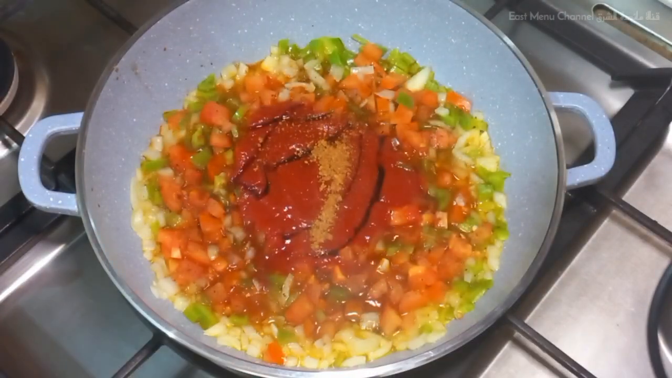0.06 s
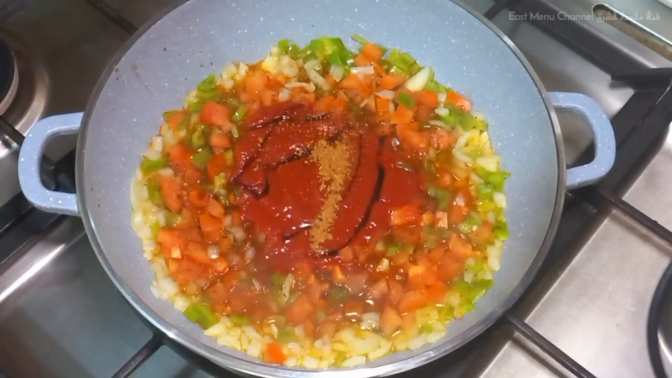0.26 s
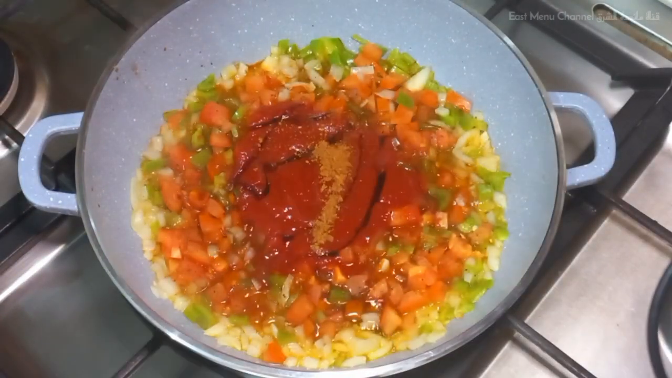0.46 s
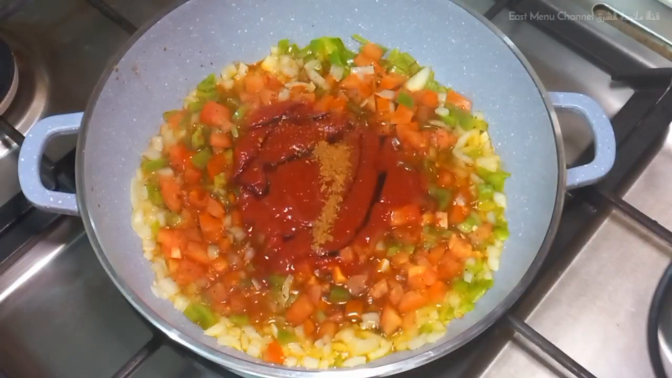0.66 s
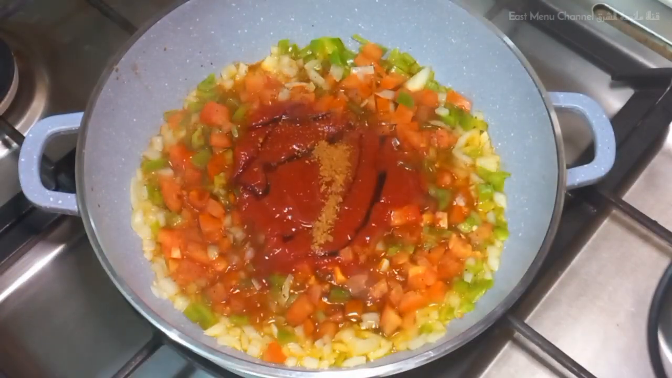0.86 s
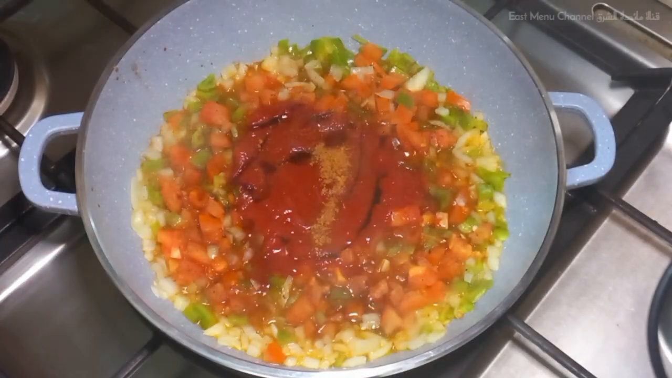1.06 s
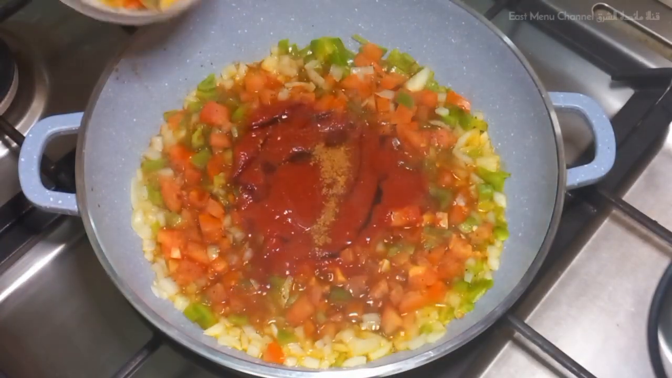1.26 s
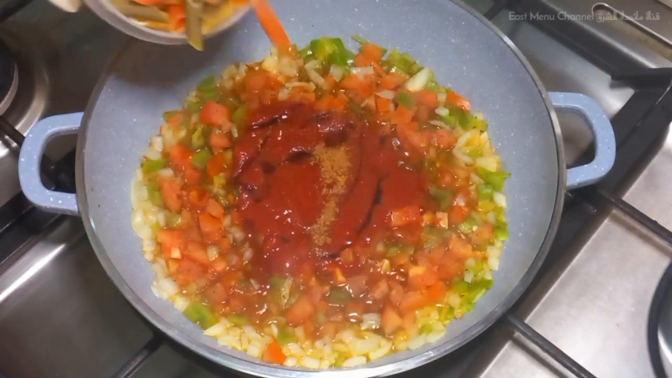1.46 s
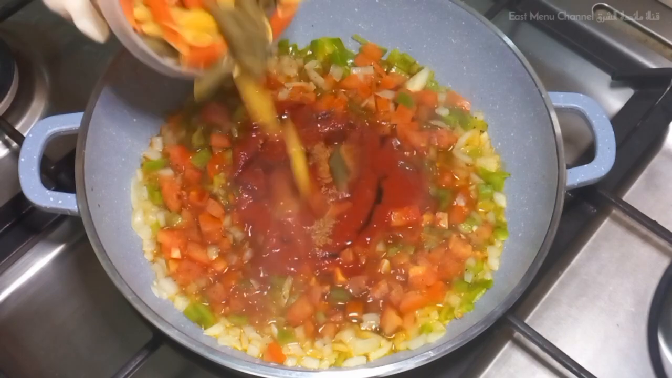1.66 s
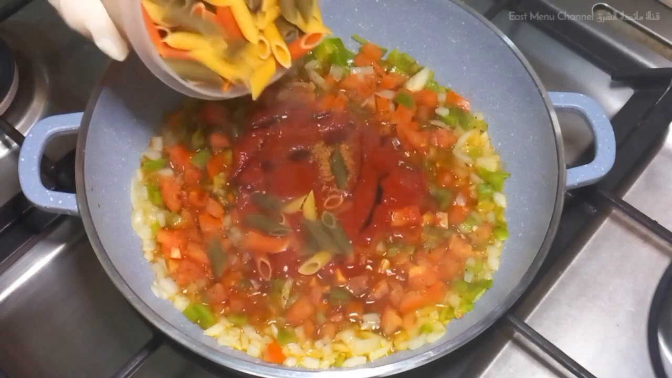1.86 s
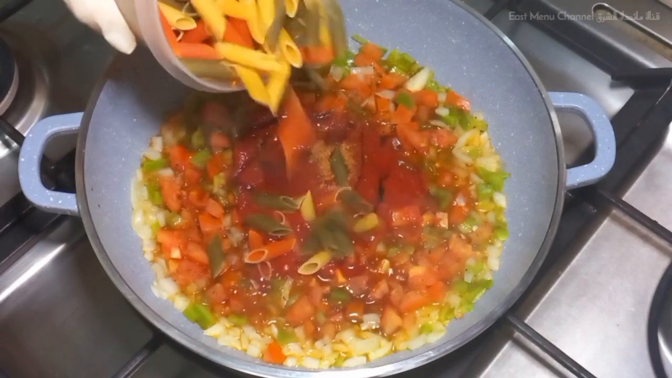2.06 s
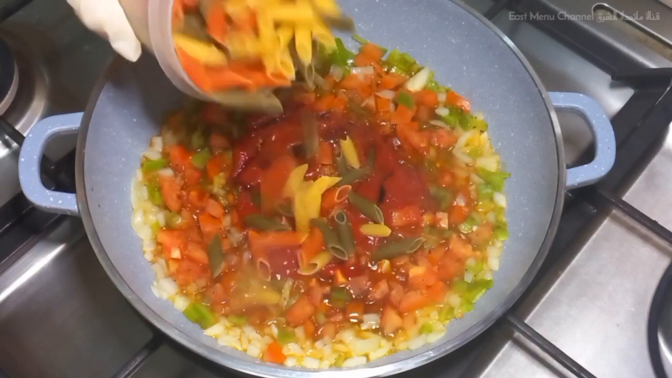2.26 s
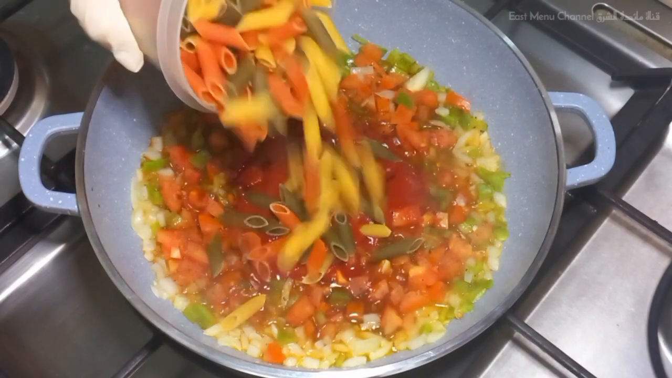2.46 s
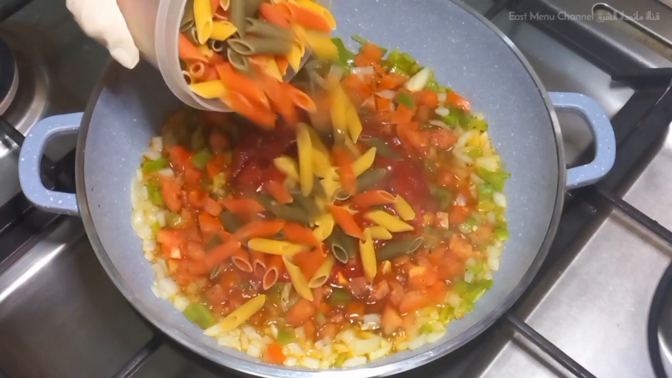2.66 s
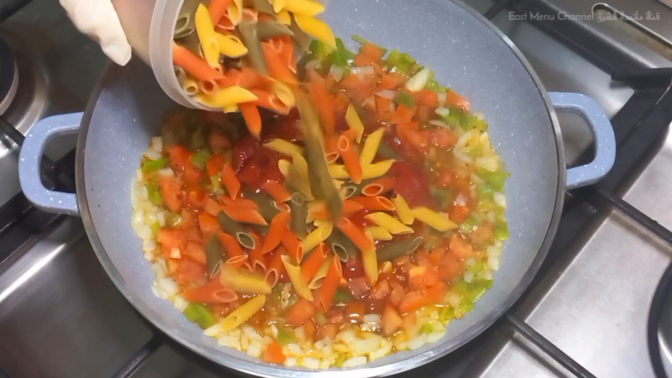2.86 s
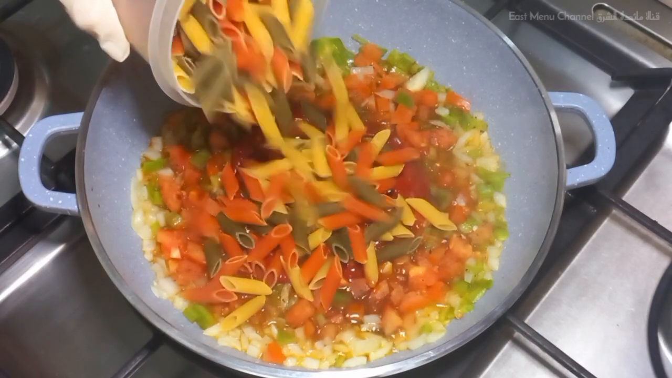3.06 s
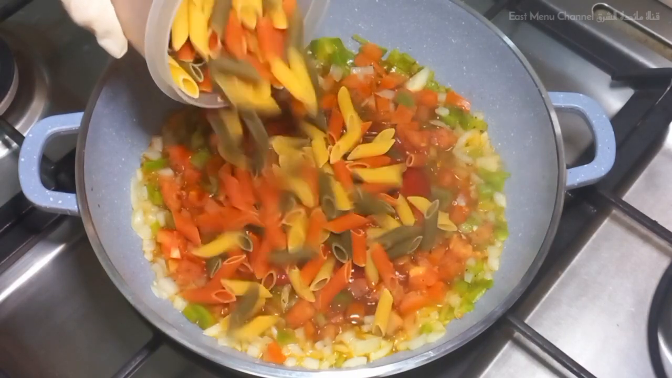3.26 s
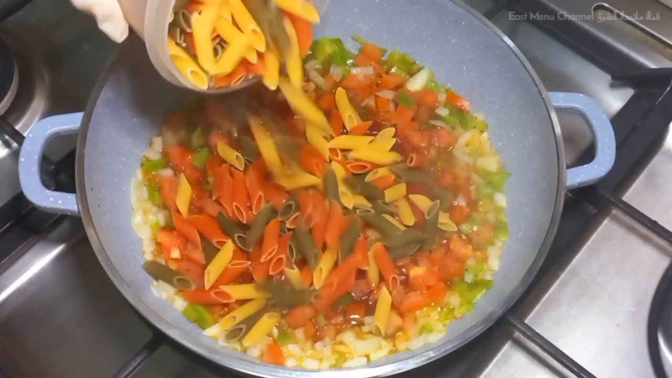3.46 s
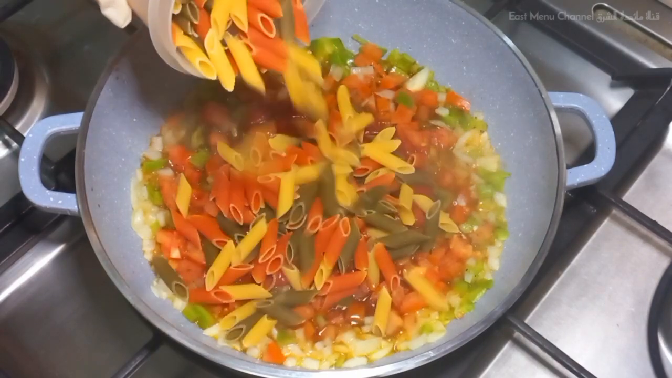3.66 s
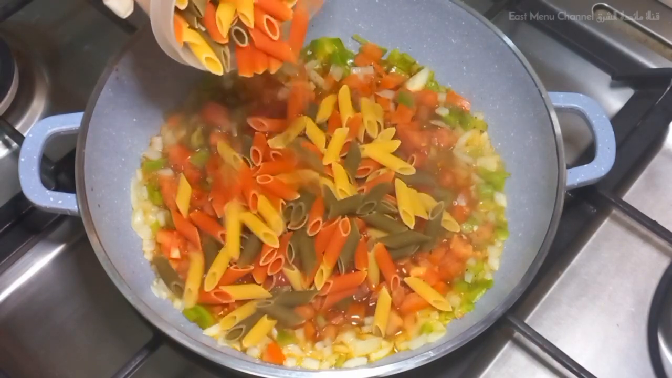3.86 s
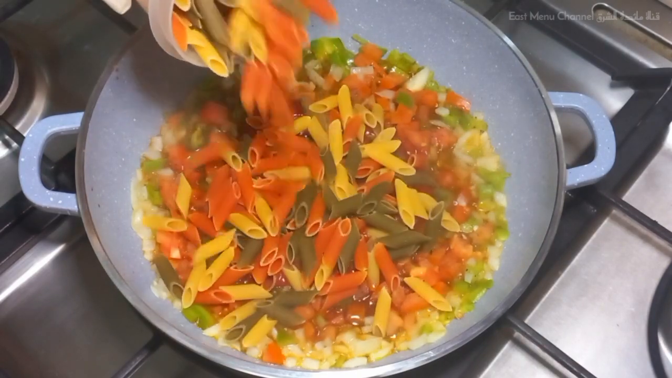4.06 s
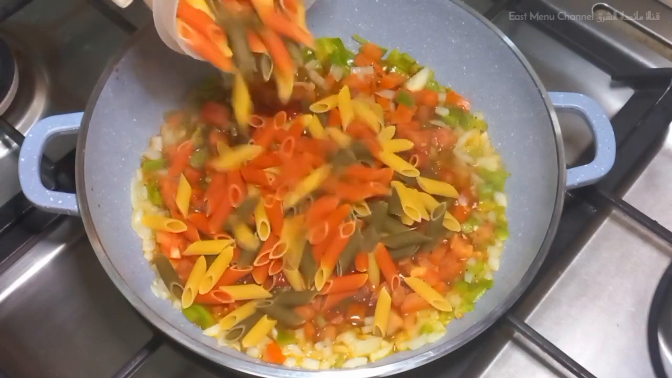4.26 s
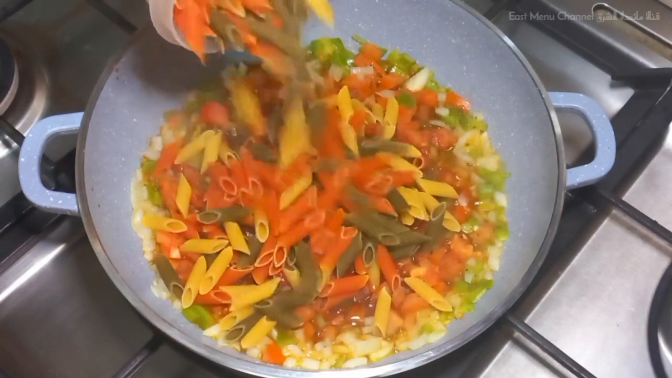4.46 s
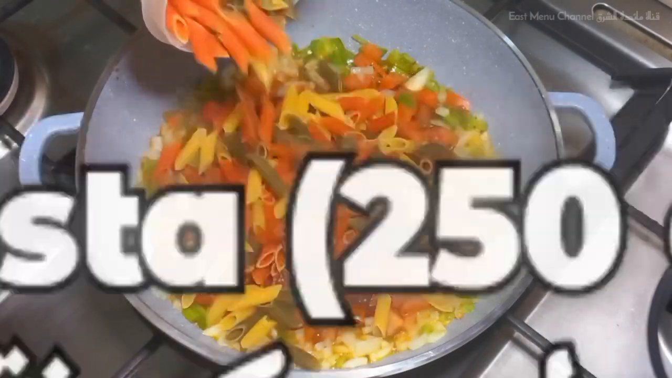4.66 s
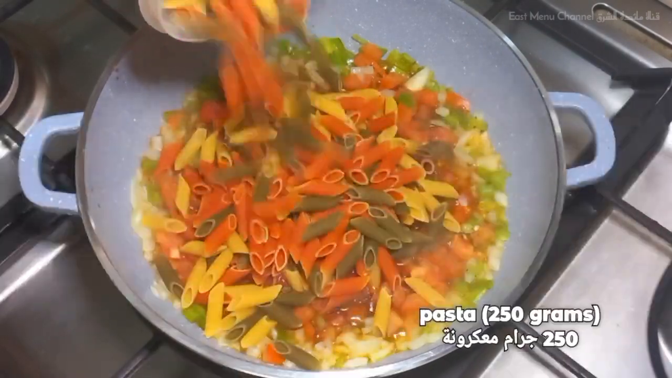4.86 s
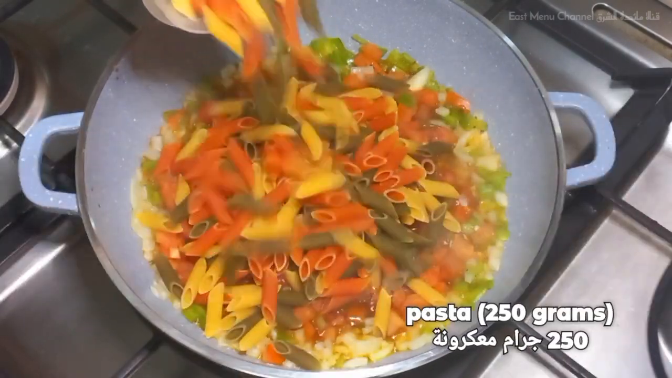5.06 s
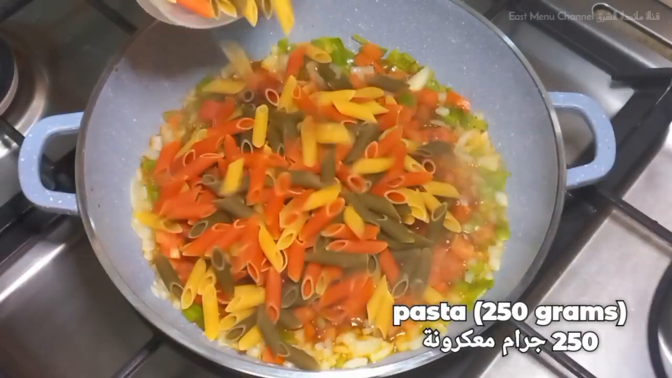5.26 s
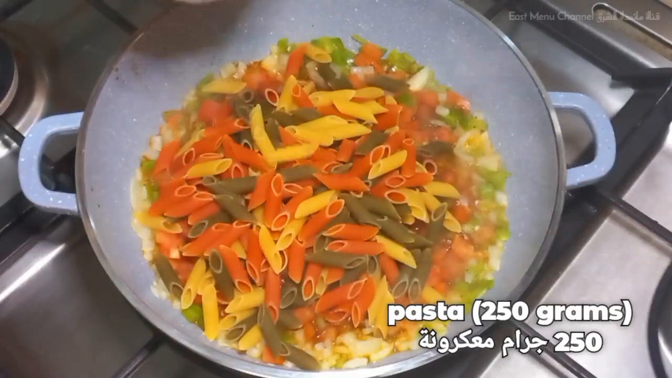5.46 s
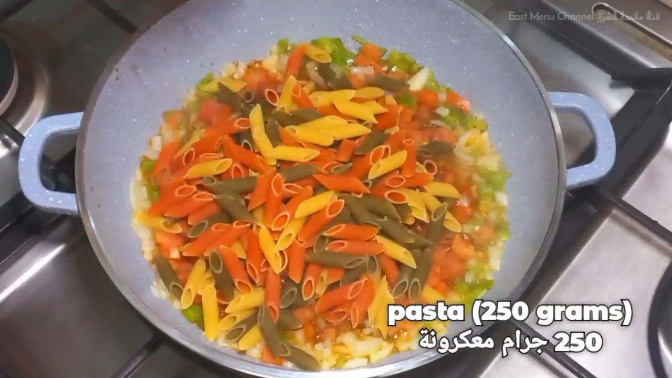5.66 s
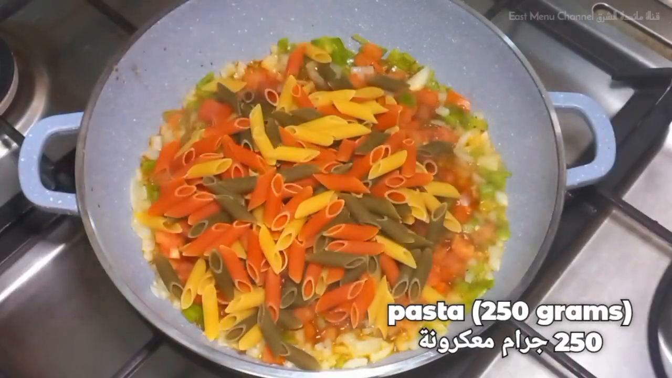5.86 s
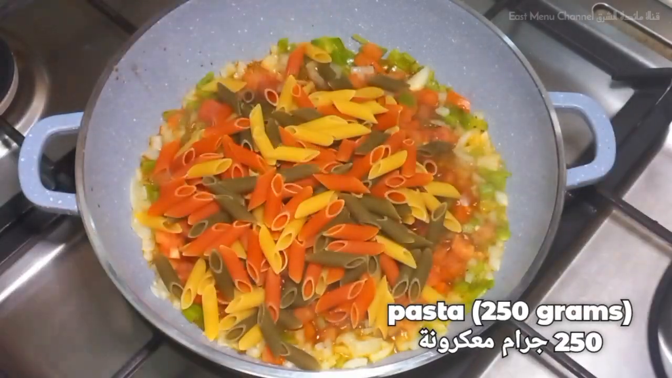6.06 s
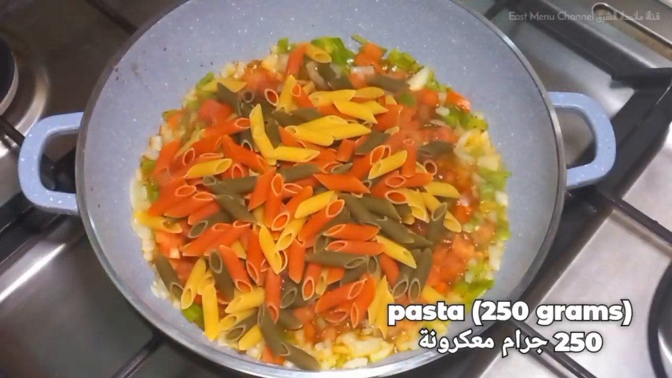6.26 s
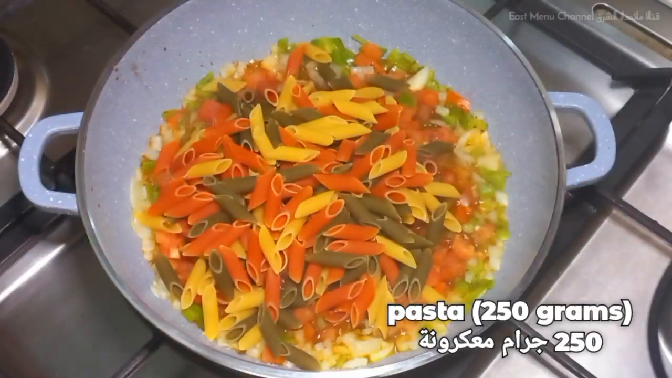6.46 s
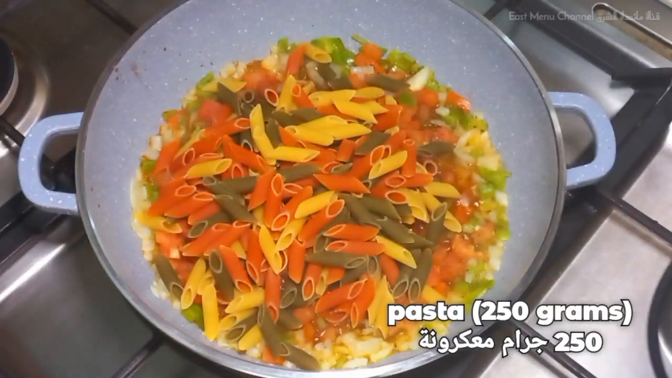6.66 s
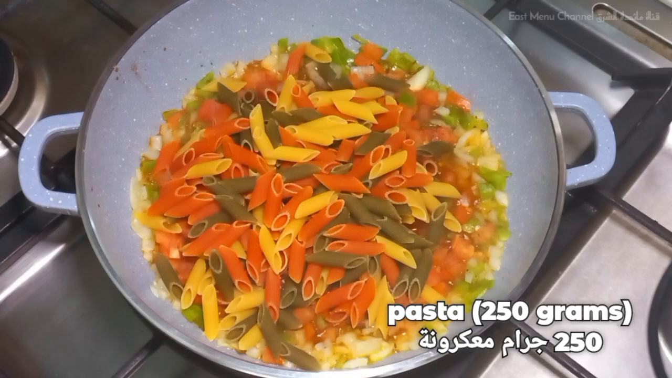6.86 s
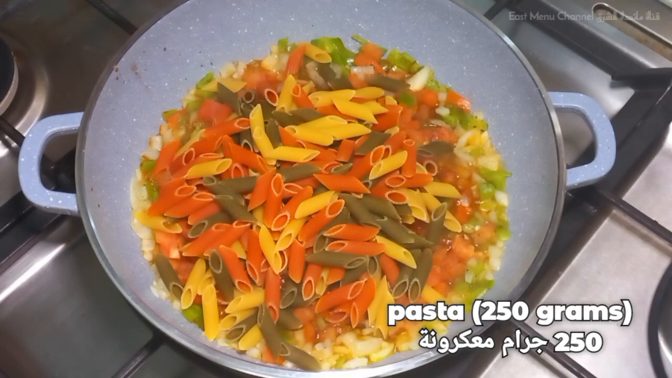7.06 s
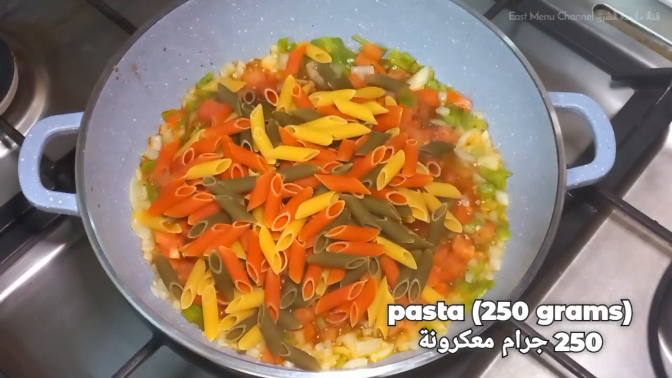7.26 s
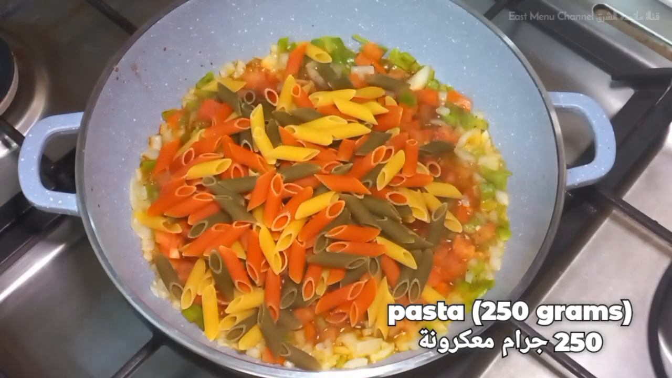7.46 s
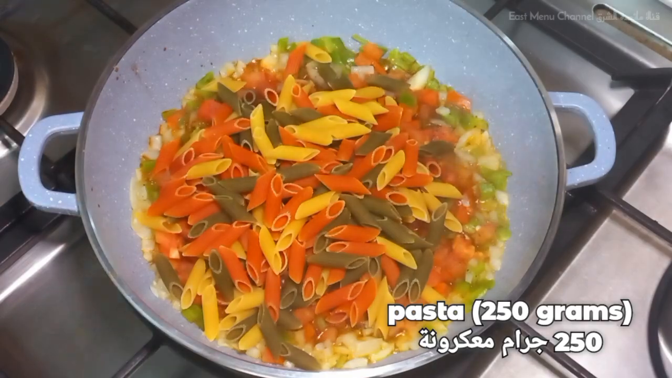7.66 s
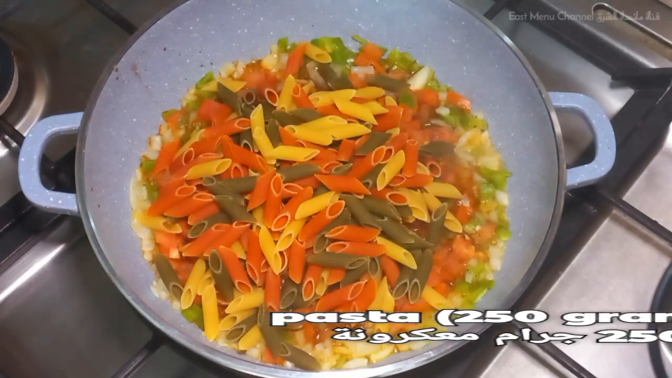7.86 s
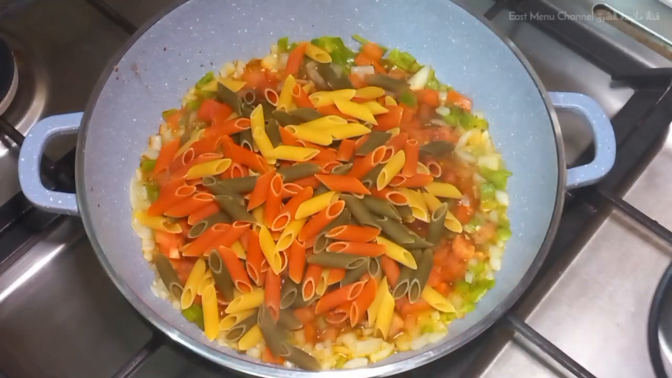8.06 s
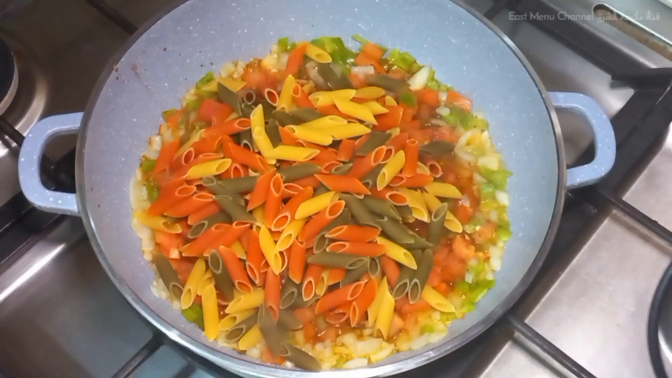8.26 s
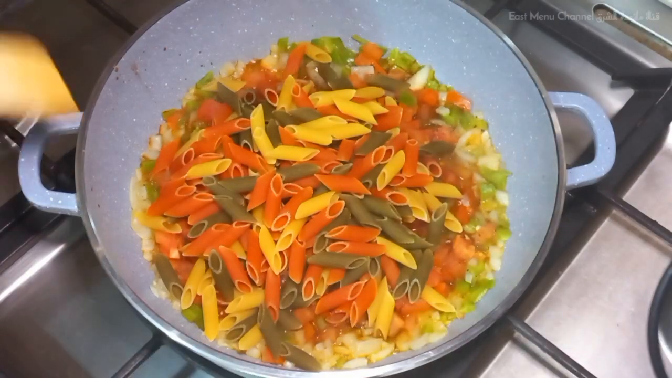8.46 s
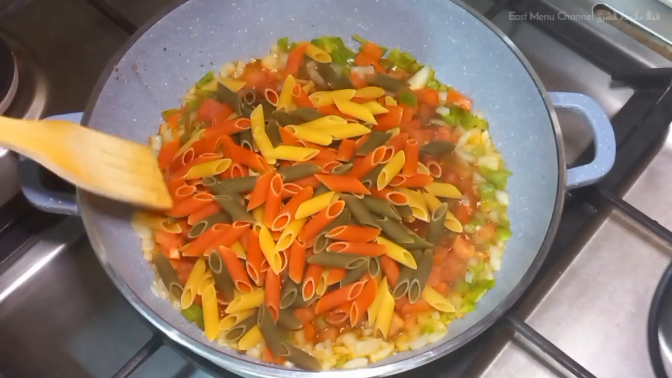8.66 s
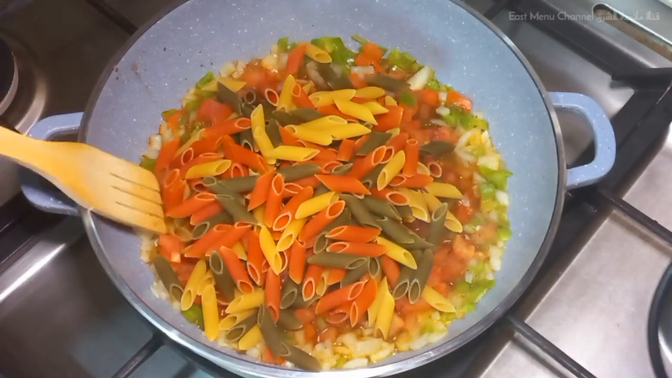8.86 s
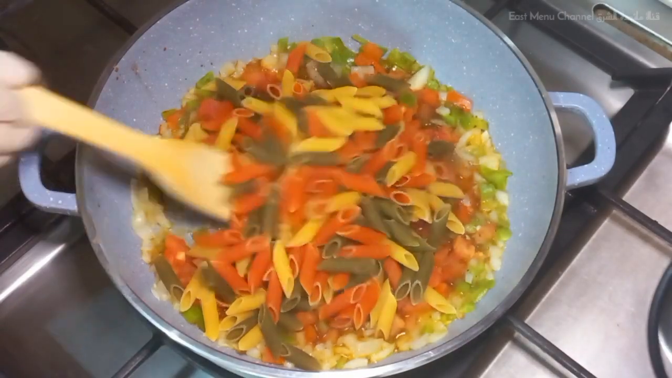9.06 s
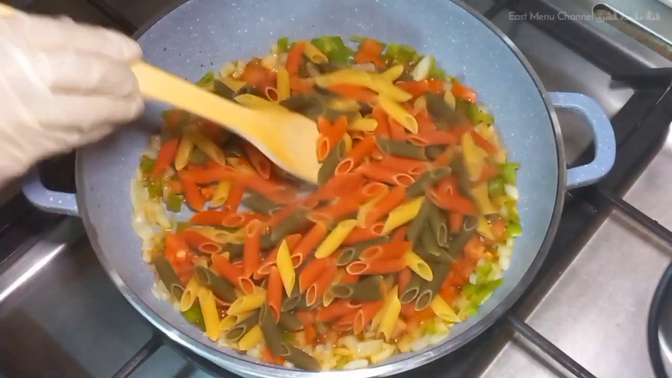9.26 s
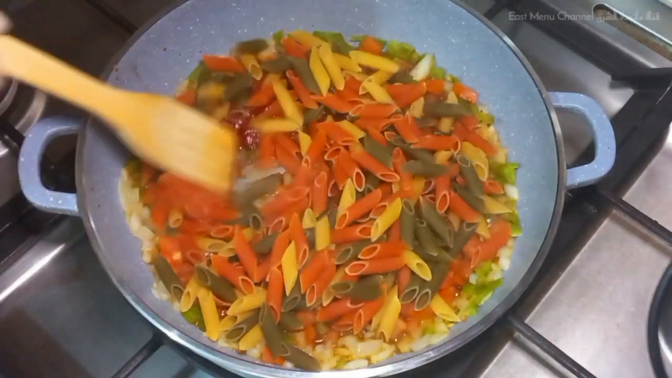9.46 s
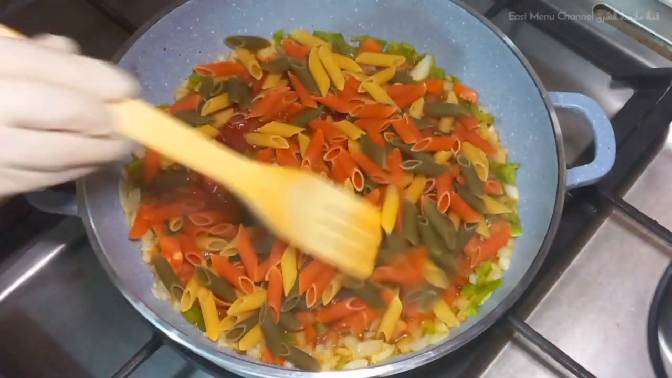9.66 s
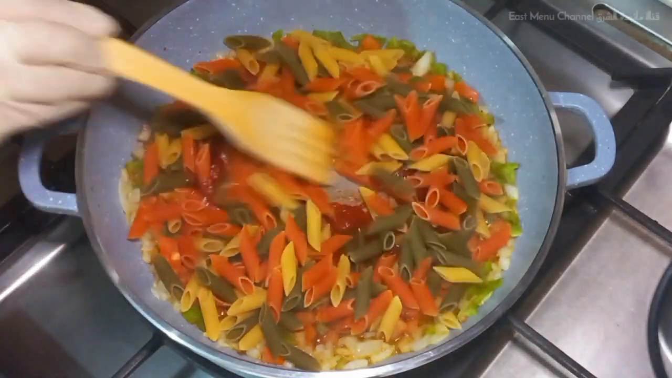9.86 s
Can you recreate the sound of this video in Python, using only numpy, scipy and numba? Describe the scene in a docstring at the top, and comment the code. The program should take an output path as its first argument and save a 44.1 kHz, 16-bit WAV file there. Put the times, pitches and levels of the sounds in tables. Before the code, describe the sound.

A close phone-like stereo pickup at a kitchen stove. From 0 to 0.9 s, vegetables fry with steady wet hiss, sharp crackles and bubbly oil pops, over faint burner rumble and soft low thumps. The level dips almost to silence around 0.94 s and returns at once. From 1.0 s, dry pasta clicks dully in a plastic cup, with hard knocks at 1.6 to 1.75 s; from about 1.75 to 5.5 s it pours into the pan, a dense bright clatter in surges, lighter around 3 to 3.8 s and strongest from 4 to 5.1 s. At 5.6 to 6.6 s the cup knocks and scrapes hollowly on the counter. Gentle sizzling and occasional thumps remain until a wooden spatula knocks the pan, briefly ringing, at 8.77 s. From 9 s to the end, stirring makes duller pasta rattles, scuffs and renewed sizzling.

```python
"""Dry pasta tubes rattle out of a plastic cup into a wide pan, as damped tube modes and noise bursts.
The cup is knocked and slid on the counter, by stick-slip; a wooden spatula then excites the pan modes and
pushes the pasta about. Vegetables fry as hiss, crackles and bubbles; soft thumps come through the stove.
A phone hears it all in two channels that are partly coherent; the level dips briefly once."""
import sys
import numpy as np
from scipy import signal
from scipy.fft import rfft, irfft
from scipy.io import wavfile
from scipy.ndimage import uniform_filter1d
from numba import njit

SR = 44100
rng = np.random.default_rng(int(sys.argv[2]) if len(sys.argv) > 2 else 0)


def materialize(psi):
    """Save the field psi as 16-bit PCM at rate SR to the path in sys.argv[1].

    A 1-D psi becomes a single channel; in a 2-D psi each row is a channel.
    """
    bounded = np.clip(np.atleast_2d(psi).T, -1, 1)
    quanta = np.round(bounded * 32767).astype(np.int16)
    wavfile.write(sys.argv[1], SR, quanta)


N = 437472
T = np.arange(N) / SR
HZ = np.maximum(np.fft.rfftfreq(N, 1 / SR), 1)

# All table levels are relative: each function adds its own gain.


def undb(db):
    """Level definition: amplitude ratio of a level in dB."""
    return 10 ** (np.asarray(db) / 20)


def over_hz(table):
    """Spectral envelope: interpolates a table along log frequency."""
    hz, value = np.transpose(table)
    return np.interp(np.log(HZ), np.log(hz), value)


def over_time(table):
    """Temporal envelope: interpolates each column in time, -120 dB outside the table."""
    s, *columns = np.transpose(table)
    return [np.interp(T, s, c, left=-120, right=-120) for c in columns]


def noise(gain, lo_hz, hi_hz):
    """Spectral shaping: three unrelated noises (common, left's own, right's own), joint rms 1."""
    edges = 1 / np.sqrt((1 + (lo_hz / HZ) ** 8) * (1 + (HZ / hi_hz) ** 8))
    x = irfft(rfft(rng.standard_normal((3, N))) * gain * edges, N)
    return x / x.std()


def resonances(table):
    """Resonance: the power responses of damped modes (f/Hz, width/Hz, level/dB) add."""
    return np.sqrt(sum(undb(db) ** 2 / (1 + (2 * (HZ - hz) / width) ** 2) for hz, width, db in table))


@njit
def decay(start, pole, size, rise):
    """Free decay: each grain swells briefly while its rotation dies away; a real pole gives an envelope."""
    out = np.zeros(N)
    for k in range(len(start)):
        z, i, r = size[k], start[k], 1.
        while i < N and abs(z) > .0003 * abs(size[k]):
            r *= rise
            out[i] += z.real * (1 - r)
            z *= pole[k]
            i += 1
    return out


def envelope(s, db, t60, rise_s=.0008):
    """Incoherent summation: bursts of unrelated noise add in power."""
    pole = np.exp(-np.log(1e6) / (np.clip(t60, .002, 5) * SR)) * np.ones(len(s))
    start = (s * SR).astype(np.int64)
    power = decay(start, pole + 0j, undb(2 * db) + 0j, np.exp(-1 / (rise_s * SR)))
    return np.sqrt(power)


def rings(s, hz, db, t60, rise_s=.0008, turns=1):
    """Modal decay: damped sines whose phases in the three paths differ by up to so many turns."""
    pole = np.exp((2j * np.pi * hz - np.log(1000) / t60) / SR) * np.ones(len(s))
    phase, *paths = rng.random((len(s), 4)).T
    phases = np.exp(2j * np.pi * (phase + turns * np.array(paths)))
    start, rise = (s * SR).astype(np.int64), np.exp(-1 / (rise_s * SR))
    return np.array([decay(start, pole, undb(db) * p, rise) for p in phases])


def walk(rate):
    """Slow random modulation: a new random level every 1 / rate s, joined by straight slopes."""
    k = int(SR / rate)
    return uniform_filter1d(np.repeat(rng.standard_normal(N // k + 1), k), k)[:N]


def scatter(count, spread_db):
    """Random arrivals: a few louder grains among many soft ones, with a spare random number each."""
    s, size, u = rng.random((count, 3)).T
    return s * N / SR, -spread_db * np.log(1.008 - size), u


# thumps through the stove: t/s, peak level/dB, hardness/dB (more knock, less boom)
THUMPS = [(0.109, -26.5, -13), (0.528, -22, 7.5), (0.607, -31, 11), (0.882, -28.5, 15.5), (0.983, -32, 4),
          (2.138, -29, 6), (2.342, -34, 8), (2.804, -35, 9), (3.873, -38, 21), (5.659, -36.5, 6),
          (5.925, -31.5, 7), (6.243, -33, -11), (6.907, -31, -3), (7.2295, -38, 18.5), (7.289, -34.5, 10),
          (7.311, -41.5, 25), (7.999, -32.5, 2), (8.415, -25.5, 8), (8.789, -24.5, 12), (8.934, -25, 7),
          (8.961, -30, 14), (9.091, -28, -5), (9.739, -27, -7)]
# short modes of the stove top: f/Hz, level/dB
STOVE = [(140, -8.5), (270, -2), (500, -6), (710, -11)]
# rumble level at a frying level of -38 dB before waver, and dB per dB of frying
RUMBLE_DB, RUMBLE_SLOPE = -57, 0.6
BOOM_DB, BOOM_PER_HARD, BOOM_T60_S = -12, 0.69, 0.27


def thumps():
    """Structure-borne sound: low bursts with a boom and a shorter knock, over wavering burner rumble."""
    s, db, hard_db = np.transpose(THUMPS)
    (fry_db,) = over_time(FRY)
    rumble = undb(RUMBLE_DB + RUMBLE_SLOPE * (fry_db + 38.0) + walk(6.2))
    boom = envelope(s, db + BOOM_DB - BOOM_PER_HARD * hard_db, BOOM_T60_S, rise_s=0.011)
    low = np.hypot(rumble, boom) * noise(resonances([(97.0, 21, 4), (30, 40, -15)]), 15, 230)
    knock = sum(rings(s, hz, db + d - 6 + .6 * hard_db, .05, rise_s=.0004, turns=.1) for hz, d in STOVE)
    dull = envelope(s, db - 10.0, 0.53, rise_s=0.0052) * noise(1, 116, 450)
    hard = envelope(s, db + hard_db - 13.0, 0.15, rise_s=0.0015) * noise(1, 460, 980)
    return low + knock + dull + hard


# frying level as heard, lower while the loud pasta rattles: t/s, level/dB
FRY = [(0.0, -34), (0.8, -36.5), (1.02, -40.5), (1.55, -39), (1.72, -51), (3.8, -63), (5.5, -47.5),
       (6.7, -42), (8.75, -40), (9.5, -34.5), (9.62, -46), (9.92, -33)]
# colour of hiss and crackle: f/Hz, spectral level/dB
FRY_HISS = [(120, -20), (200, -17), (420, -15.5), (560, -10), (700, -7), (1050, -4), (1400, -5.5),
            (2600, -9.5), (6500, -9), (8100, -16), (12700, -9), (15500, -12)]
# the loudest crackles: t/s, peak level/dB
CRACKLES = [(0.025, -13), (0.085, -6), (0.117, -5), (0.325, -9), (0.614, -4), (0.701, -5), (0.7655, -17),
            (0.819, -6)]
# oil pops: t/s, peak level/dB, f/Hz
POPS = [(0.118, -8, 1110), (0.277, -22, 1280), (0.325, -12.5, 1140), (0.398, -9, 1194), (0.433, -22, 1175),
        (0.616, -8, 1020), (0.705, -18, 1300), (0.75, -12, 1160), (0.783, -12, 1110), (0.816, -14, 1100)]
# soft hiss and crackle that rise with the pasta stream: level at a stream of -23.5 dB
# before the frying gain, and dB per dB
STREAM_HISS_DB, STREAM_HISS_SLOPE = -38.5, 1.18


def frying():
    """Boiling noise: steam hiss, crackles that burst over it, and bubbles and oil pops that ring."""
    (fry_db,) = over_time(FRY)
    colour = undb(over_hz(FRY_HISS))
    hiss = undb(walk(25)) * noise(colour, 100, 11900)
    s, db, u = scatter(count=4000, spread_db=4.0)
    sharp = noise(colour, 1680, 24000)
    crackle = envelope(s, db - 7.5, 0.01 + 0.048 * u, rise_s=.0001) * sharp
    s, db = np.transpose(CRACKLES)
    loud = envelope(s, db - 14.0, 0.051, rise_s=.0001) * sharp
    s, db, u = scatter(count=3500, spread_db=3.2)
    bubbles = rings(s, 960 * 1.33 ** u, db - 11.0, 0.081, rise_s=0.0015)
    s, db, hz = np.transpose(POPS)
    pops = rings(s, hz, db - 6.0, 0.046)
    stream_hiss_db = STREAM_HISS_DB + STREAM_HISS_SLOPE * (stream_db() + 23.5)
    strength = np.hypot(undb(fry_db), undb(stream_hiss_db))
    return undb(8.5) * strength * (hiss + crackle + bubbles) + loud + pops


# strokes on the pan wall: t/s, peak level/dB, hardness/(dB per octave);
# a flat, soft contact leaves the high modes quiet
SPATULA = [(8.765, -20.5, 1), (8.794, -24.5, -7), (8.94, -41, -4)]
# pan modes: f/Hz, level/dB, t60/s, swell/s; the food damps the low modes,
# and some modes fill only after the blow
PAN = [(218, -15, .2, .015), (310, -14, .2, .015), (492, -3, .17, .012), (834, 1.5, .1, .001),
       (1233, -2, .22, .002), (1742, 2, .45, .08), (2040, -14, .2, .003), (2227, -2, .28, .002),
       (2374, -5, .9, .004), (2364, -17, .5, .004), (2923, -10, .33, .004)]


def spatula():
    """Impact excitation: wood on coated metal drives the pan modes, a noise tail and a short crack."""
    s, db, hard_db = np.transpose(SPATULA)
    modes = 0
    for hz, d, t60, swell in PAN:
        mode_db = db + d + hard_db * np.log2(hz / 1000)
        modes = modes + rings(s, hz, mode_db, t60, rise_s=swell, turns=.1)
    tail = envelope(s, db - 5, 0.5) * noise(1 / np.sqrt(HZ), 370, 4200)
    crack = envelope(s, db + 7.5, 0.025, rise_s=.0002) * noise(1, 700, 4700)
    return modes + tail + crack


# two pushes on the counter: t/s, level/dB of the hollow, which stands for the pressure
SLIDE = [(5.57, -48), (5.7, -33), (5.9, -33), (6.01, -42), (6.08, -38), (6.24, -33.5), (6.277, -29),
         (6.29, -23), (6.39, -27), (6.46, -26), (6.56, -32), (6.63, -43)]
# cup knocks: t/s, hollow peak level/dB, click level/dB
KNOCKS = [(5.7, -2.5, -15), (5.821, -4.5, -16.5), (5.882, -7.5, -5), (6.284, -3.5, -17), (6.318, -27, -17),
          (6.328, -10, -20), (6.4, -10, -15), (6.425, -25, -11), (6.441, -22, -28), (6.483, -9, -22),
          (6.497, -17, -24), (6.532, -29, -20)]
# cup resonances, the first three its hollow: f/Hz, width/Hz, level/dB
CUP = [(490, 25, -11), (587, 67, 4.5), (632, 37, -9), (1520, 68, 0.5), (1840, 105, 5.5), (2400, 980, 0.5),
       (3570, 3300, -7), (4860, 1200, -9)]
SCRATCH_DB, SCRATCH_SLOPE = -25, 1.65  # scratch level at a hollow of -30.5 dB, and dB per dB


def cup():
    """Stick-slip friction: grains and knocks ring the hollow of the cup; the base scratches above it."""
    (hollow_db,) = over_time(SLIDE)
    scratch_db = SCRATCH_DB + SCRATCH_SLOPE * (hollow_db + 30.5)
    s, db, u = scatter(count=5000, spread_db=3.0)
    grit = envelope(s, db, 0.029 + 0.029 * u)
    grit = .3 + .7 * grit / grit.mean()
    hollow = noise(resonances(CUP[:3]) ** 1.05, 450, 970)
    scratch = noise(resonances(CUP[3:]), 740, 7100)
    bright_scratch = scratch + undb(-18) * noise(1, 11000, 13000)
    slide = grit * (undb(hollow_db + 3.5) * hollow + undb(scratch_db) * bright_scratch)
    s, db, click_db = np.transpose(KNOCKS)
    knocks = sum(rings(s, hz, db + d - 4.5, 3.16 / width, rise_s=0.0038, turns=0.32)
                 for hz, width, d in CUP[:3])
    return slide + knocks + envelope(s, click_db, 0.026) * scratch


# a few hard knocks of pasta on the wall of the tilting cup: t/s, peak level/dB
RATTLES = [(1.6195, -7), (1.6232, -12), (1.7208, -11), (1.725, -10), (1.7527, -16), (1.756, -15)]
# modes of the cup wall: f/Hz, level/dB, t60/s
CUP_WALL = [(1946, -7, 0.033), (2520, -20, .045), (3400, -18, .05), (4750, -1.5, 0.034), (5000, -6, 0.034),
            (5300, -6, 0.083), (5780, -2, 0.03), (6600, -3, 0.11), (6880, -7, .06), (7400, -17, 0.086)]


def rattles():
    """Thin-wall vibration: brief modes under a dry tick, blurred by the pieces that lie against the wall."""
    s, db = np.transpose(RATTLES)
    touch_db = 2.5 * rng.standard_normal((len(s), len(CUP_WALL))).T  # every knock lands elsewhere
    wall = sum(rings(s, hz, db + d + touch, t60, rise_s=0.00027, turns=0.38)
               for (hz, d, t60), touch in zip(CUP_WALL, touch_db))
    tick = envelope(s, db, 0.019, rise_s=.0001) * noise(1, 700, 9600)
    blur = noise(resonances([(hz, 400, d) for hz, d, t60 in CUP_WALL]), 1000, 7600)
    return undb(-2.5) * wall + tick + envelope(s, db - 8, 0.07, rise_s=.0002) * blur


# pasta streams, one table pouring in surges and one stirring: t/s, level/dB
STREAM = [
    [(1.0, -35.5), (1.25, -44), (1.6, -34), (1.7, -41.5), (1.73, -28.5), (1.85, -42.5), (2.11, -36.5),
     (2.44, -29), (2.84, -35.5), (2.9, -45), (2.94, -37), (2.99, -37), (3.08, -35.5), (3.29, -32.5),
     (3.6, -38.5), (3.96, -31), (4.11, -32), (4.17, -26), (4.36, -28), (4.53, -26), (4.59, -30.5),
     (4.69, -30.5), (4.77, -39), (4.83, -26.5), (5.07, -28), (5.45, -42), (5.55, -45.5)],
    [(8.9, -61), (9.0, -34.5), (9.11, -31), (9.145, -34), (9.25, -27.5), (9.37, -27), (9.54, -30),
     (9.62, -45), (9.71, -32), (9.92, -27)],
]


def stream_db():
    """Piecewise level: the pouring stream, then the stirring stream."""
    return np.maximum(*(over_time(table)[0] for table in STREAM))


# bending modes of a typical tube: f/Hz
TUBE_HZ = [1937, 2575, 3660, 4580, 5300, 5900, 7370]


def tube_hz(count):
    """Bending modes: one of the tube modes, shifted because every tube has its own length."""
    pick, length = rng.random((count, 2)).T
    return np.array(TUBE_HZ)[(pick * len(TUBE_HZ)).astype(int)] * (1 + 0.13 * (length - .5))


# colour of the clack bursts: f/Hz, spectral level/dB
PASTA = [(1500, -9.5), (1900, -11), (3100, -4.5), (6800, 4.5), (7600, -3.5), (8400, -5), (13500, 3.5),
         (15900, -0.5)]
# pan under the pasta: f/Hz, width/Hz, level/dB
BOWL = [(207.5, 19, -7.5), (303, 21, -3.5), (495.6, 30, 3), (689, 87, 0), (1068, 81, 2), (1536, 55, -2.5),
        (1710, 230, -3.5)]
# edges of the burst bands: f/Hz
BAND_HZ = [1500, 2800, 4800, 7800, 11500, 17000]
RING_BAND_DB = 4.5  # extra burst in the band that holds the strongest ring
LOW_BAND_SHARE = 0.66  # the lowest band swells with the body
BORE_HZ, BORE_SPREAD = 6950, 0.0735  # air in the bore of a tube; whole relative spread over the tubes


def clatter(s, db, treble_db, body_db, ring_hz, t60, tone_db):
    """Impact radiation: tick and coloured burst, the pan below, a strong ring, a weaker mode and the bore."""
    colour = undb(over_hz(PASTA))
    out = envelope(s, db + body_db, 1.72 * t60, rise_s=0.00027) * noise(resonances(BOWL), 143, 3200)
    tint_db = 2.5 * rng.standard_normal((len(s), len(BAND_HZ) - 1)).T  # no two pieces land alike
    for lo_hz, hi_hz, tint in zip(BAND_HZ, BAND_HZ[1:], tint_db):
        band_db = db + tint - 3.5 + treble_db * (lo_hz > 7000)
        band_db = band_db + RING_BAND_DB * ((ring_hz > lo_hz) & (ring_hz < hi_hz))
        band_db = band_db + LOW_BAND_SHARE * (body_db + 3.0) * (lo_hz == BAND_HZ[0])
        burst = envelope(s, band_db, t60 * (4000 / lo_hz) ** 0.091)
        tick = envelope(s, band_db + 4, .004, rise_s=.0001)
        out = out + (burst + tick) * noise(colour, lo_hz, hi_hz)
    mode_hz = tube_hz(len(s))
    bore_hz = BORE_HZ * (1 + BORE_SPREAD * (rng.random(len(s)) - .5))
    hz = np.concatenate([ring_hz, mode_hz, bore_hz])
    tones_db = np.concatenate([db, db - 5, db - 5]) + tone_db
    return out + rings(np.tile(s, 3), hz, tones_db, .95 * np.tile(t60, 3), turns=.4)


# single pasta clacks: t/s, peak level/dB, ring f/Hz, treble level/dB relative to the peak
CLACKS = [(1.0648, -5, 4200, -22), (1.068, -11, 3130, -24), (1.446, -11, 1910, -17),
          (1.591, -7.5, 3900, -32), (2.0355, -10.5, 6130, -22), (2.0498, -9, 5800, -10.5),
          (2.117, -7, 6470, -12), (2.225, -11, 2760, -13), (2.238, -9.5, 3400, -14),
          (2.2495, -2.5, 1980, -17), (2.301, -8.5, 4830, -9), (2.336, -9, 6500, -21),
          (2.4216, -6, 6600, -9), (2.4953, -6.5, 6060, -7.5), (2.537, -4.5, 6860, -11),
          (2.6052, -7, 7560, -8), (2.628, -6.5, 5760, -14), (2.652, -10.5, 6930, -8),
          (2.7024, -10.5, 6750, -7), (2.7356, -7.5, 6850, -11), (2.7608, -10, 4640, -4.5),
          (2.808, -10.5, 5300, -5.5), (2.8583, -10.5, 7260, -13), (2.866, -11.5, 5500, -14),
          (2.92, -15.5, 7350, -10), (3.015, -13.5, 6160, -10), (3.0388, -14.5, 6360, -10),
          (3.257, -14, 6130, -9), (3.2767, -18, 6940, -12), (3.316, -14, 6940, -11),
          (3.3585, -13.5, 3710, -23), (3.388, -11, 6600, -11), (3.4633, -16, 7040, -7.5),
          (3.559, -9.5, 3540, -14), (3.618, -13.5, 5470, -16), (3.665, -14, 3630, -11),
          (3.6902, -14, 4760, -13), (3.8623, -12.5, 3540, -11), (3.8907, -11, 6940, -3.5),
          (3.9322, -3.5, 5580, -12), (4.012, -10, 6200, -18), (4.0624, -7, 6660, -8.5),
          (4.1429, -4.5, 2800, -19), (4.174, -16.5, 6400, 1), (4.2024, -3.5, 6600, -16),
          (4.23, -3.5, 2670, -14), (4.3017, -12, 6560, -7), (4.319, -5.5, 2570, -10),
          (4.3967, -4.5, 1760, -21), (4.462, -10.5, 7000, -26), (4.6064, -21.5, 6800, 4),
          (4.6187, -3.5, 7000, -15), (4.674, -7.5, 2410, -6), (4.7135, -11.5, 6180, -13.5),
          (4.762, -17, 7100, -5.5), (4.819, -12.5, 1780, -20), (4.8428, -11, 6330, -27),
          (4.858, -11, 2470, -18), (4.9045, -6.5, 6600, -19.5), (4.941, -6.5, 1750, -7),
          (4.973, -4, 6740, -9), (5.0114, -7.5, 5800, -23), (5.025, -6, 4330, -7), (5.062, -10, 5780, 0),
          (5.0837, -12, 7200, -4), (5.203, -12.5, 6300, -9), (5.2317, -7.5, 2310, -8.5),
          (5.2614, -9.5, 6800, -9), (5.2907, -18, 6700, -2), (5.342, -14, 7160, -11),
          (5.3803, -9, 7060, -10.5), (5.4597, -14, 6560, -13), (1.473, -12.5, 1630, -22),
          (2.187, -14, 6900, -11), (2.343, -3, 4440, -19), (2.527, -12, 3470, -14), (2.358, -5, 5060, -22),
          (2.407, -16, 6120, -21), (2.721, -12, 3680, -12), (2.937, -12.5, 7300, -8),
          (3.074, -13.5, 6900, -11), (3.106, -19, 7000, -6), (3.286, -14, 6610, -4),
          (3.333, -14.5, 3580, -11), (3.721, -23, 7000, -3), (3.771, -14.5, 6720, -15),
          (3.15, -19, 5000, -14), (3.872, -10.5, 3580, -20), (3.956, -9, 2700, -13),
          (4.021, -20, 6090, -12), (4.151, -14, 2680, -9), (4.168, -6, 6660, -7), (4.24, -3, 6700, -17),
          (4.251, -12, 2700, -5), (4.284, -10, 6550, -13), (4.337, -12, 3800, -11), (4.403, -7, 1880, -23),
          (4.418, -13, 5000, -20), (4.43, -15, 7000, -8), (4.477, -14, 2500, -19), (4.491, -10, 7200, -16),
          (4.512, -11, 6980, -6), (4.533, -7, 6700, -9), (4.566, -9.5, 6630, -11), (4.916, -2, 3560, -18),
          (4.994, -5.5, 6600, -11), (5.038, -11.5, 6450, -4), (5.053, -13, 2460, -6), (5.104, -9, 2240, -1),
          (5.308, -14, 7100, -7), (9.253, -13, 5740, -16), (9.274, -10, 6550, -20), (9.872, -8, 4200, -14),
          (1.104, -13, 3960, -23), (1.278, -16.5, 4040, -22), (1.3392, -14, 2040, -31),
          (1.4894, -23, 1850, -23), (1.8286, -18, 4520, -11), (1.92, -22.5, 7100, -2),
          (1.9944, -18.5, 4040, -24), (2.3708, -7.5, 6600, -13), (2.552, -5.5, 4800, -7.5),
          (5.4087, -20.5, 6930, -5), (9.0565, -27, 4940, -15), (9.1658, -2, 7300, -26),
          (9.1983, -7, 5700, -30), (9.225, -6, 6850, -26), (9.3427, -5.5, 6100, -26),
          (9.3674, -7.5, 3540, -27), (9.3995, -21, 3340, -10), (9.413, -8, 1310, -28),
          (9.4856, -9, 4130, -25), (9.512, -1, 7120, -34), (9.5508, -15, 7260, 0.5),
          (9.566, -18, 3430, -25), (9.647, -12.5, 3550, -30), (9.6775, -14, 6040, -21),
          (9.702, -11.5, 2250, -15), (9.744, -13.5, 3300, -26), (9.799, -15, 2200, -18.5),
          (9.8852, -8, 3050, -28), (9.912, -22, 2500, -22)]
# dull in the cup, bright when it falls dry, dull again when stirred: t/s, treble level/dB, body level/dB;
# the single clacks take only the body from here
PASTA_COLOUR = [(0, -19, 6.5), (1.75, -11, -4.5), (1.95, 3.5, -2.5), (2.3, -3, 1), (2.7, 2.5, -6.5),
                (3.6, -5, -6), (4.3, 0, -4), (5.6, 0, 3), (8.8, -3, -9), (9.2, -10, 0.5), (9.4, -24, -9),
                (9.92, -12, -2.5)]
# tubes that lie free and ring on: t/s, peak level/dB, f/Hz
FREE_TUBES = [(9.565, -35, 3720)]
USUAL_TREBLE_DB = -13  # treble relative to the peak for the plain pasta colour
CLACK_BODY_DB, CLACK_SCATTER_DB = -7.5, 3
CLACK_T60_S, STREAM_T60_S = .027, .035  # decay scales, stretched by band and, in the stream, by piece
FREE_T60_S, TRAIL_T60_S, CLUMP_SHARE = .3, 0.19, 0.46


def pasta():
    """Granular impact: loud clacks, each with a quick rebound, over a dense stream of small ones."""
    s, db, ring_hz, under_db = np.transpose(CLACKS)
    treble_db, body_db = over_time(PASTA_COLOUR)
    at, own_db = (s * SR).astype(int), CLACK_SCATTER_DB * rng.standard_normal(len(s))
    colour = [under_db - USUAL_TREBLE_DB, body_db[at] + own_db + CLACK_BODY_DB, ring_hz]
    wait, loss = rng.random((len(s), 2)).T
    s = np.concatenate([s, s + 0.0015 + 0.0068 * wait])
    db = np.concatenate([db, db - 3 - 5 * loss])
    colour = np.tile(colour, 2)
    colour[2] *= 1 + 0.017 * rng.standard_normal(len(s))  # small random shift of every ring
    clacks = clatter(s, db - 11, *colour, np.full(len(s), CLACK_T60_S), tone_db=0)

    trail = envelope(s, db, TRAIL_T60_S) + 0.081  # small pieces tumble after each loud one
    clump_db = CLUMP_SHARE * 20 * np.log10(trail / uniform_filter1d(trail, SR // 5))
    s, db, hz = np.transpose(FREE_TUBES)
    free = rings(s, hz, db, FREE_T60_S, rise_s=.002, turns=.2)

    s, db, u = scatter(count=5000, spread_db=1.5)
    at = (s * SR).astype(int)
    small_db = (stream_db() + clump_db)[at] + db - 3.0
    small = clatter(s, small_db, treble_db[at], body_db[at] - 3.0, tube_hz(len(s)),
                    STREAM_T60_S * (1 + u), tone_db=-2.0)
    return clacks + free + small


# likeness of the two channels: f/Hz, power share common to both
ALIKE = [(30, .5), (120, .88), (300, .66), (640, .66), (1400, .35), (3100, .25), (6800, .3), (9000, .5),
         (15000, .5)]
LAG_TOP_HZ = 7120  # above this the common part reaches both channels without lag


def channels(paths, lag_s):
    """Partial coherence: mixes the common path, which leads on the left below LAG_TOP_HZ, with each own."""
    common, left, right = rfft(paths)
    alike = np.clip(over_hz(ALIKE), 0, 1)
    lead = np.exp(1j * np.pi * HZ * lag_s * (HZ < LAG_TOP_HZ))  # half the lag on each side
    mixed = [np.sqrt(alike) * common * turn + np.sqrt(1 - alike) * own
             for turn, own in ((lead, left), (1 / lead, right))]
    return irfft(mixed, N)


LAG_S, CUP_LAG_S = 0.000097, 0.00026  # left channel before right; the cup stands well to one side
FADE_S, FADE_OUT_S, FADE_IN_S = 0.94, 0.09, 0.05  # quietest moment and the ramps around it


def scene():
    """Superposition: the sources add in the two channels, and the level dips briefly once."""
    fade = np.clip(np.maximum((FADE_S - T) / FADE_OUT_S, (T - FADE_S) / FADE_IN_S), .03, 1)
    at_pan = frying() + pasta() + rattles() + spatula() + thumps()
    return fade * (channels(at_pan, LAG_S) + channels(cup(), CUP_LAG_S))


TOP_HZ = 15900


def record(dry):
    """Saturation and band limiting: the phone rounds the loudest peaks and cuts the deep bass and the top."""
    rounded = np.tanh(1.005 * dry) / 1.219
    x = signal.sosfilt(signal.butter(3, 60, "high", fs=SR, output="sos"), rounded)
    return signal.sosfilt(signal.ellip(14, .2, 85, TOP_HZ, fs=SR, output="sos"), x)


dry = scene()
out = record(dry)
materialize(out)
```